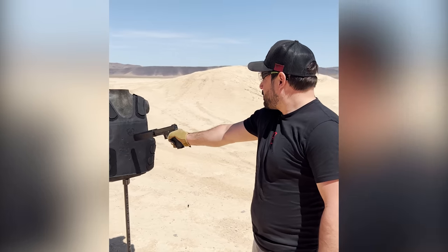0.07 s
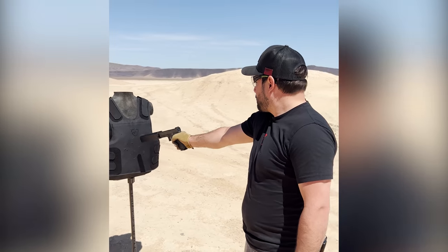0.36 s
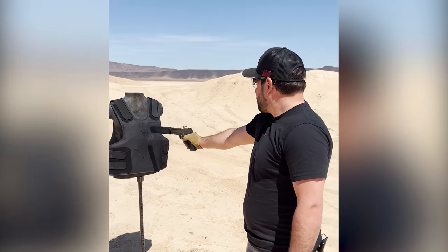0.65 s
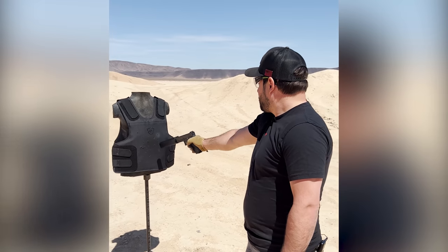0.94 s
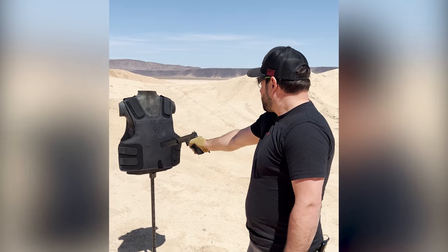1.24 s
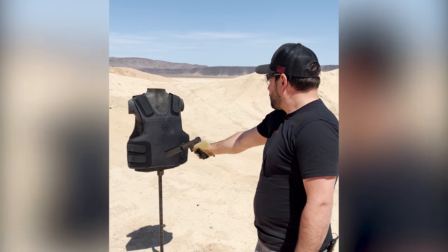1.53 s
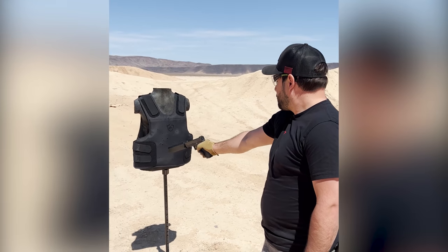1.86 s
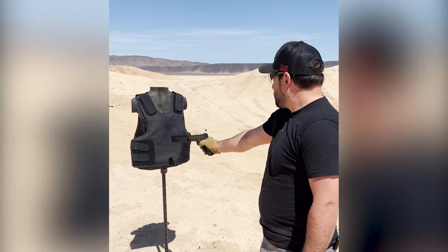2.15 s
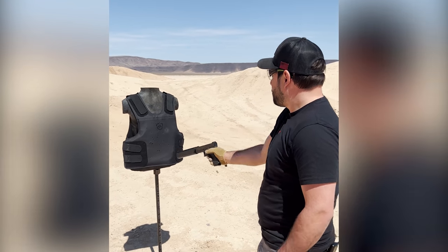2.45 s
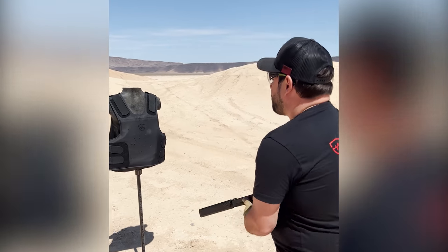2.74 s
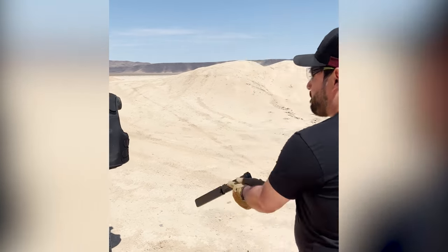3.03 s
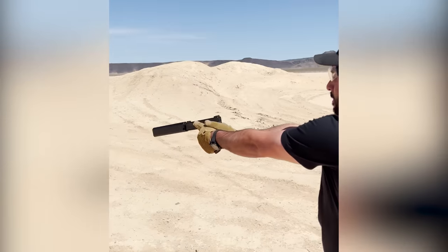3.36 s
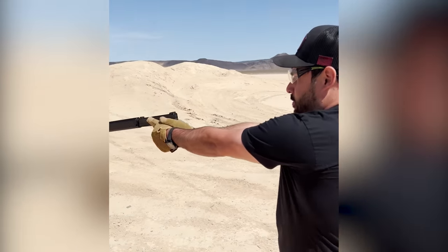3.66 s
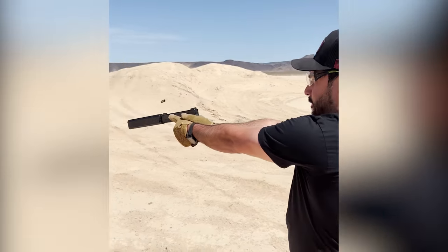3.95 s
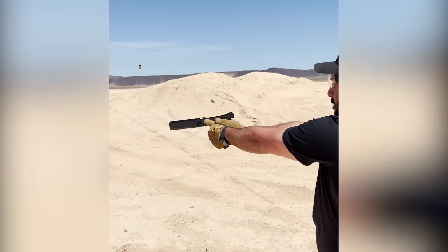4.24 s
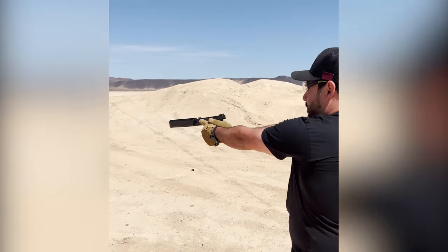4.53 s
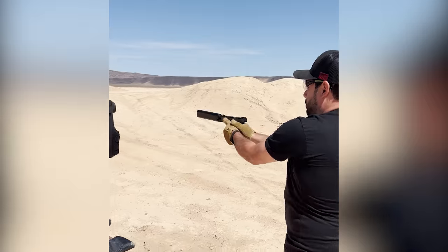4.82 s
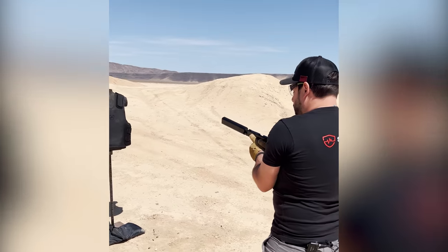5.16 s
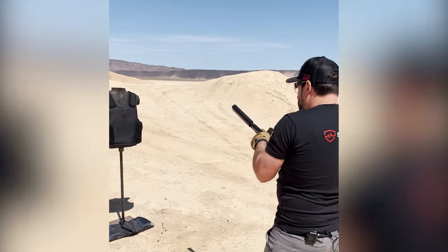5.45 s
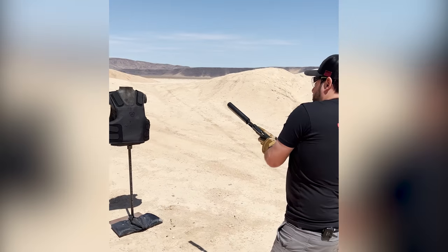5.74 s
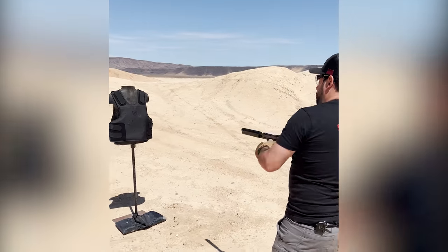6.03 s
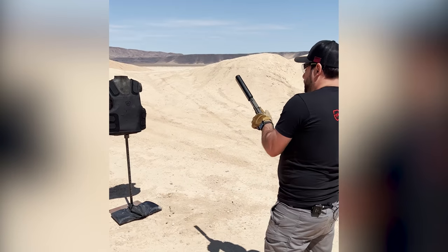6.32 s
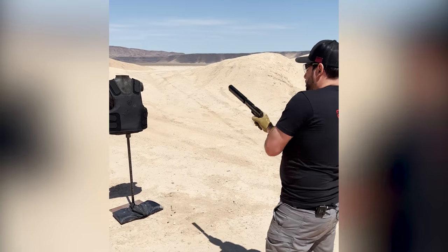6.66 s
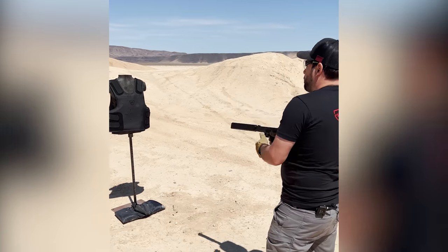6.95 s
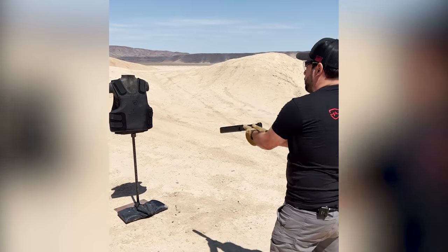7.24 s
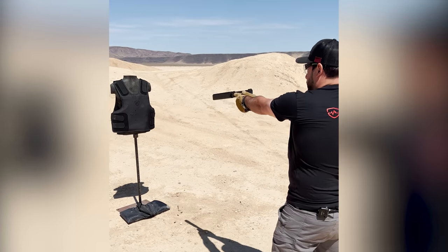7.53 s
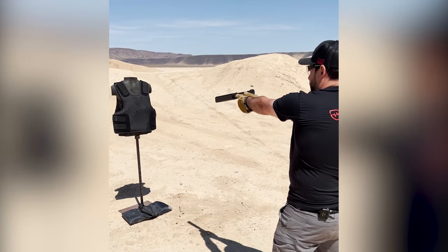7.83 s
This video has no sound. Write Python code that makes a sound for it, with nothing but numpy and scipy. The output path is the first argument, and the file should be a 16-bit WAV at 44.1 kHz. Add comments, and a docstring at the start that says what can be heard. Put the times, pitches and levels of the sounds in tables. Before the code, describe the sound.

A suppressed pistol fires five close shots, then two, is reloaded with metallic clacks and fires once more, as wind buffets the microphone.

```python
"""Five suppressed pistol shots in open desert, then two, a reload with the slide racked, and one more.
Each is a muzzle pop, a steel crack as the action opens and a dull thud. Most end with the slide closing
and the trigger resetting; on the seventh the slide locks back with a faint click. Sand rasps underfoot,
brass cases ring, clothes swish. From about 2.8 s gusts buffet the microphone of a phone a couple of
metres away; each bang ducks their rumble."""
import sys
import numpy as np
from scipy import signal
from scipy.fft import rfft, irfft
from scipy.io import wavfile
from scipy.ndimage import uniform_filter1d

SR = 44100
rng = np.random.default_rng(int(sys.argv[2]) if len(sys.argv) > 2 else 0)


def unload_audio(sound):
    """Save the sound as a 16-bit wav file, at the path given as the first command line argument."""
    columns = np.transpose(np.atleast_2d(sound))
    # keep every value between -1 and 1, then stretch to whole-number steps
    steps = np.round(np.clip(columns, -1, 1) * 32767)
    wavfile.write(sys.argv[1], SR, steps.astype(np.int16))


N = 352359
T = np.arange(N) / SR
HIT_T = T[:8192]


def amp(db):
    return 10 ** (np.asarray(db) / 20)


def add(out, start_s, x):
    i = max(int(start_s * SR), 0)
    out[i:i + len(x)] += x[:max(len(out) - i, 0)]


def band(x, lo_hz, hi_hz):
    return signal.sosfilt(signal.butter(2, [lo_hz, hi_hz], "band", fs=SR, output="sos"), x)


def colour(x, eq, tilt_db=0, size=4096):
    """Minimum-phase filter through (f/Hz, gain/dB) points, plus a tilt from 1.8 to 12 kHz."""
    hz, db = np.transpose(eq)
    log_f = np.log(np.maximum(np.fft.rfftfreq(size, 1 / SR), 1))
    gain_db = np.interp(log_f, np.log(hz), db) + tilt_db * np.interp(log_f, np.log([1800, 12000]), [0, 1])
    cepstrum = irfft(np.log(amp(gain_db)))
    cepstrum[1:size // 2] *= 2
    cepstrum[size // 2 + 1:] = 0
    return signal.fftconvolve(x, irfft(np.exp(rfft(cepstrum))))[:len(x)]


def whiten(force):
    """Flatten chance spectral peaks so a blow stays dry and unpitched."""
    power = uniform_filter1d(np.abs(rfft(force)) ** 2, size=64)
    hz = np.fft.rfftfreq(len(force), 1 / SR)
    return colour(force, np.column_stack([hz, -10 * np.log10(power)])[1:])


def unit_rms(x):
    return x / np.std(x)


def hit(x, db, window_s=0.003):
    """Scale x so its energy, packed into window_s, has an rms of db."""
    return x * amp(db) * np.sqrt(window_s * SR / np.sum(x ** 2))


def fade(t, t60_s):
    return np.exp(-np.log(1000) * t / t60_s)


def ring(modes, t, detune=0):
    """Decaying (f/Hz, level/dB, t60/s) modes; detune is the relative pitch spread between blows."""
    return sum(amp(db) * fade(t, t60_s) * np.sin(2 * np.pi * hz * (1 + detune * rng.standard_normal()) * t)
               for hz, db, t60_s in modes)


def contact(grind_s, t60_s, grain_db=4.5):
    """Force of parts grinding together, then chattering to rest in uneven grains."""
    grains = np.repeat(amp(grain_db * rng.standard_normal(len(HIT_T) // 32)), 32)
    return rng.standard_normal(len(HIT_T)) * grains * fade(np.maximum(HIT_T - grind_s, 0), t60_s)


def wander(rate_hz):
    """Smooth random control, spread near 1."""
    points = rng.standard_normal(N // 100)
    return np.sqrt(3 / 2) * np.interp(T * rate_hz, np.arange(len(points)), points)


def swells(rows, taper=1):
    """Summed power of (centre/s, length/s, level/dB) swells; taper is the share spent rising and falling."""
    power = np.zeros(N)
    for centre_s, length_s, db in rows:
        shape = signal.windows.tukey(int(length_s * SR), taper)
        add(power, centre_s - length_s / 2, (amp(db) * shape) ** 2)
    return power


# slide and frame modes: f/Hz, level/dB, t60/s
SLIDE_MODES = [(780, -1, .025), (2045, 3, .045), (2520, -2, .03), (3105, 2, .055), (3470, 0, .055),
               (4200, -2, .03), (5890, 0, .045), (6410, -1, .04), (7045, -3, .03), (9135, -3, .05),
               (9600, -2, .04), (10325, 0, .045), (11400, 1, .04), (13710, 0, .03), (14985, 4, .035)]


def steel(force, ring_db):
    """A force heard directly and through the modes of the slide."""
    modes = ring(SLIDE_MODES, HIT_T, detune=0.0033)
    return force + amp(ring_db) * signal.fftconvolve(force, modes)[:len(force)]


# striker and trigger spectrum: f/Hz, gain/dB
TRIGGER_EQ = [(200, -25), (700, -15.5), (1500, -11), (3000, -6.5), (3900, -17), (6000, 2.5), (7200, -6),
              (8800, -19), (11000, -10), (13000, 0.5), (16000, 2)]


def striker():
    """The striker falls with a short click."""
    return colour(contact(0.001, 0.006), TRIGGER_EQ, tilt_db=-8.5)


def muzzle_pop():
    """Gas leaves the suppressor: a damped pulse and a spit of hiss."""
    pulse = -ring([(1590, -1, 0.0038), (3100, -4, 0.00017)], HIT_T, detune=0.11)
    return pulse + amp(-12) * contact(0.00037, 0.016)


# spectrum of the action opening: f/Hz, gain/dB
CRACK_EQ = [(30, -27.5), (100, -4), (400, -2.5), (800, 4), (1600, -10.5), (2600, 3), (4200, -4.5),
            (6200, -0.5), (8500, -5.5), (11000, -5.5), (15000, 5.5), (17000, -1)]


def action_crack():
    """The action opens with a dry steel crack."""
    return colour(steel(whiten(contact(0.0029, 0.004)), ring_db=-56.5), CRACK_EQ)


def gas_boom():
    """The slow outflow of gas gives one low swing of pressure."""
    return band(ring([(105, 0.19, 0.034), (204, 0.81, 0.018)], HIT_T, detune=0.05), 58, 700)


# rear stop spectrum: f/Hz, gain/dB
THUD_EQ = [(25, -31.5), (70, -10.5), (200, -7), (380, -4.5), (630, 1.5), (870, -3.5), (1100, -2.5),
           (1450, -2), (2100, -8.5), (3000, -19), (8000, -27.5), (16000, -43)]


def slide_thud():
    """The slide hits its rear stop."""
    return colour(whiten(contact(0.004, 0.0083)), THUD_EQ)


# steel-on-steel spectrum: f/Hz, gain/dB
STEEL_EQ = [(80, -22), (450, -3.5), (780, 4.5), (1600, 0.5), (2200, 1), (3200, 1.5), (4200, 2.5),
            (5100, -1), (6500, 2), (8300, -4.5), (11000, 2.5), (15300, 1.5), (17000, -8.5)]


def rattle():
    """The spent case and loose parts rattle as the slide stops."""
    return colour(steel(contact(0.0013, 0.032), ring_db=-55.5), STEEL_EQ, tilt_db=-0.5)


# sand bank spectrum: f/Hz, gain/dB
BANK_EQ = [(60, 1.5), (250, 0.5), (500, 2), (850, 0.5), (1300, -5), (2200, -6.5), (4000, -16),
           (9000, -14.5), (16000, -20)]


def sand_bank():
    """Sand banks return the blast as a dry, patchy wash; 35 ms into it the bullet slaps dully into one."""
    t = T[:SR // 2]
    patchy = (rng.standard_normal(N) * amp(3 * wander(160)))[:len(t)]
    out = hit(colour(patchy * fade(t, 0.51), BANK_EQ), -34.5)
    bullet_slap = colour(contact(0.02, 0.055), BANK_EQ, tilt_db=-15)
    add(out, 0.035, hit(bullet_slap, -36.5))
    return out


def slide_latch():
    """The slide runs home or locks back: a sharp contact with a softer grind."""
    force = contact(0.00067, 0.022) + amp(-15) * contact(0.012, 0.041)
    return colour(steel(force, ring_db=-43), STEEL_EQ)


# shots: t/s, pop/dB, crack lag/ms, crack/dB, thud lag/ms, thud/dB, boom/dB, latch lag/ms, latch/dB
SHOTS = [(0.1821, -23, 2.16, -8.5, 7.15, -15.5, -24, 48.6, -27),
         (0.676, -17, 2.55, -7, 5.3, -22.5, -13.5, 48, -28),
         (1.1641, -20, 3.2, -8.5, 5.94, -9.5, -20, 47, -27.5),
         (1.676, -18.5, 2.32, -11.5, 5.07, -10.5, -25.5, 50, -26.5),
         (2.1499, -16.5, 2.75, -5, 6.2, -12.5, -14.5, 48, -27),
         (3.89, -15.5, 1.9, -16, 9.4, -10.5, -17, 48.5, -28.5),
         (4.1659, -12, 0.55, -14.5, 9.7, -12.5, -36, 40, -41),
         (7.7692, -11.5, 0.57, -12.5, 8.5, -11.5, -22, 51, -23)]


def gunfire():
    """The parts of each shot, timed from the muzzle pop."""
    out = np.zeros(N)
    for t_s, pop_db, crack_ms, crack_db, thud_ms, thud_db, boom_db, latch_ms, latch_db in SHOTS:
        parts = [(-2.6, hit(striker(), -36.5)),
                 (0, hit(muzzle_pop(), pop_db)),
                 (crack_ms, hit(action_crack(), crack_db)),
                 (crack_ms, hit(gas_boom(), boom_db)),
                 (thud_ms - 1.5, hit(slide_thud(), thud_db)),
                 (thud_ms, hit(rattle(), -16.5)),
                 (15, sand_bank()),
                 (latch_ms, hit(slide_latch(), latch_db))]
        for lag_ms, part in parts:
            add(out, t_s + lag_ms / 1000, part)
    return out


# ground scatter spectrum: f/Hz, gain/dB
GROUND_EQ = [(60, -15.5), (250, -8.5), (700, -3), (2000, -4.5), (5000, -4), (9000, -6.5), (16000, -1)]


def ground_scatter(x, db, t60_s=0.15, rise_s=0.0069):
    """No walls: a quick scatter off rough ground."""
    t = T[:SR // 2]
    envelope = fade(t, t60_s) * (1 - np.exp(-t / rise_s))
    response = colour(rng.standard_normal(len(t)) * envelope, GROUND_EQ)
    return amp(db) * signal.fftconvolve(x, response / np.linalg.norm(response))[:N]


# recoil spring modes: f/Hz, level/dB, t60/s
RECOIL_MODES = [(448, 1.5, 2.1), (860, -4.5, 1.4), (1370, -11.5, 0.69), (1830, -25, .7), (3110, -9, .4)]


def recoil_spring(shot_db=-63, release_s=6.73, release_db=-56):
    """The spring hums after each shot, harder when the slide is let go by hand."""
    out = np.zeros(N)
    strokes = [(t_s, shot_db) for t_s, *_ in SHOTS] + [(release_s, release_db)]
    for t_s, db in strokes:
        add(out, t_s, amp(db) * ring(RECOIL_MODES, T[:SR], detune=0.00049))
    return out


def tick(db, tilt_db, hz):
    """A small part touches another and rings briefly."""
    tone = ring([(hz, 0, 0.0035)], HIT_T, detune=0.02)
    touch = hit(contact(0.00064, 0.0061), 0) + hit(tone, -7.5)
    return hit(colour(touch, STEEL_EQ, tilt_db), db)


# light contacts: t/s, level/dB, tilt/dB, f/Hz
PART_TICKS = [(0.3075, -43.5, -12, 5500), (1.0865, -54, 5, 6000), (1.131, -53, -20.5, 2400),
              (1.296, -44, -51, 1220), (2.3397, -52, -25.5, 1500), (2.4589, -48, -21, 4200),
              (2.7733, -45, -44, 4000), (2.8702, -45.5, -15, 3460), (2.8936, -41, -25, 3480),
              (2.914, -42, 29, 11100), (4.137, -28, 8.5, 11500), (4.144, -26.5, 11.5, 3000),
              (4.895, -31, -9, 1110), (4.9859, -36, -20, 2520), (5.027, -45, -14, 5000),
              (5.05, -36, 0, 5570), (5.071, -39, -40, 1690), (5.167, -51, 12, 11000),
              (5.2276, -49.5, -28, 3520), (5.2908, -51, -18, 1800), (5.831, -37, 14, 12000),
              (5.9605, -49, 10, 10000), (6.441, -43.5, -17, 3770), (6.5342, -30.5, -9.5, 4100),
              (7.3424, -38.5, -13, 13000), (7.5612, -43.5, -25, 2440)]


def part_ticks():
    """Gun parts and cases touch lightly."""
    out = np.zeros(N)
    for t_s, db, tilt_db, hz in PART_TICKS:
        add(out, t_s, tick(db, tilt_db, hz))
    return out


# trigger resets: t/s, level/dB, tilt/dB
TRIGGER_RESETS = [(0.366, -23.5, 1), (0.8306, -25.5, 0), (1.3619, -21, 1.5), (1.8653, -22, 2.5),
                  (2.3431, -21, -1), (4.0475, -30, -13.5), (7.924, -26.5, -7)]


def trigger(take_up_s=0.049, rebound_s=0.0062, rebound_db=-12.5):
    """The trigger takes up slack before a shot; its reset snaps and rebounds."""
    out = np.zeros(N)
    for t_s, *_ in SHOTS:
        add(out, t_s - take_up_s, tick(db=-55, tilt_db=-1, hz=6230))
    for t_s, db, tilt_db in TRIGGER_RESETS:
        for lag_s, drop_db in [(0, 0), (rebound_s, rebound_db)]:
            snap = steel(whiten(contact(0.00041, 0.0078)), ring_db=-52)
            add(out, t_s + lag_s, hit(colour(snap, TRIGGER_EQ, tilt_db), db + drop_db))
    return out


# sand spectrum: f/Hz, gain/dB
SAND_EQ = [(150, 1.5), (400, 8), (780, 12.5), (1050, 3), (1600, 1.5), (2150, 0.5), (3000, -11),
           (4800, -9.5), (7000, -20.5), (16000, -30.5)]
# shoe scuffs: centre/s, length/s, level/dB
SHOE_SCUFFS = [(.61, 0.085, -51), (.9, 0.63, -66), (1.32, .14, -62), (2.57, 0.17, -56.5), (3.36, .68, -54),
               (3.525, 0.064, -45), (5.53, 0.045, -50.5), (5.85, 0.65, -58), (6.42, 0.39, -64.5),
               (7.14, .11, -51), (7.3, .16, -52), (7.55, 0.8, -65)]


def sand(floor_db=-67.5):
    """Sand rasps under shoes, never quite still."""
    rasp = colour(rng.standard_normal(N) * amp(1.5 * wander(490)), SAND_EQ)
    return unit_rms(rasp) * np.sqrt(amp(floor_db) ** 2 + swells(SHOE_SCUFFS, taper=0.45))


# free-ringing cases: t/s, f/Hz, level/dB, t60/s, throb depth/0-1
CASE_PINGS = [(.818, 11220, -51.5, 0.2, 0), (2.461, 10940, -57, 0.22, 0.06), (2.949, 11020, -38, 0.19, 0),
              (4.143, 11600, -46, 0.8, 0.8), (4.894, 11590, -27, 0.29, 0), (5.052, 10660, -35, 0.22, .3),
              (5.324, 10700, -54, 0.35, 0)]


def brass_cases(tumble_hz=17, knock_ratio=0.42, knock_db=2.5, knock_t60_s=0.005):
    """Struck cases knock on a low mode and ring on a high one; some throb as they tumble."""
    out, t = np.zeros(N), T[:SR]
    for t_s, hz, db, t60_s, depth in CASE_PINGS:
        throb = 1 - depth * np.sin(np.pi * tumble_hz * t) ** 2
        modes = [(hz, db, t60_s), (knock_ratio * hz, db + knock_db, knock_t60_s)]
        add(out, t_s, throb * ring(modes, t))
    return out


# wind rumble spectrum: f/Hz, gain/dB
WIND_EQ = [(15, -30.5), (25, -21.5), (40, -10.5), (60, -2), (72, -1), (85, 2), (100, 0), (150, -4),
           (230, -12.5), (330, -22.5), (600, -38), (1200, -48.5), (2500, -72.5), (6000, -85)]
# breeze, springing up suddenly: t/s, level/dB
BREEZE_LEVELS = [(0, -62), (2.75, -58), (2.78, -37), (4.3, -33), (6.1, -33.5), (6.27, -49), (6.9, -50.5),
                 (7.2, -38), (7.98, -43.5)]
# gusts: centre/s, length/s, level/dB, flutter re rumble/dB
WIND_GUSTS = [(3.192, 0.5, -28, -20.5), (3.419, .26, -18.5, -26.5), (3.76, 0.52, -21, -26),
              (4.127, 0.24, -30.5, -35.5), (4.368, 0.3, -29, -31), (4.6, 0.53, -23, -38.5),
              (4.743, 0.43, -20, -26.5), (5.24, 0.41, -33, -20), (5.701, 0.16, -29.5, -34),
              (5.895, 0.27, -25.5, -20), (6.085, 0.45, -37.5, -13.5), (6.503, 0.58, -33, -47),
              (6.75, 0.27, -37.5, -34), (7.02, 0.15, -40.5, -36), (7.257, 0.39, -36, -35),
              (7.668, 0.31, -27, -21), (7.964, 0.22, -32, -24.5)]


def wind(breeze_flutter_db=-27):
    """Eddies shake the microphone port, harder in gusts; strong eddies carry a flutter of hiss."""
    eddies = unit_rms(colour(rng.standard_normal(N), WIND_EQ))
    eddies /= np.sqrt(uniform_filter1d(eddies ** 2, size=SR // 10))  # steady rms over 0.1 s
    flutter = unit_rms(band(rng.standard_normal(N), 360, 570) * np.abs(signal.hilbert(eddies)))
    breeze = amp(np.interp(T, *np.transpose(BREEZE_LEVELS)))
    gust_rumble = swells([row[:3] for row in WIND_GUSTS])
    gust_flutter = swells([(t_s, length_s, db + rel_db) for t_s, length_s, db, rel_db in WIND_GUSTS])
    rumble_power = breeze ** 2 + gust_rumble
    flutter_power = (breeze * amp(breeze_flutter_db)) ** 2 + gust_flutter
    return eddies * np.sqrt(rumble_power) + flutter * np.sqrt(flutter_power)


# cloth spectrum: f/Hz, gain/dB
CLOTH_EQ = [(500, -23.5), (2000, 3), (4500, 0.5), (6500, -1), (8500, -2), (11500, 2.5), (15000, 6.5),
            (17000, -4)]
# swishes: centre/s, length/s, level/dB
CLOTH_SWISHES = [(2.8, 0.69, -60), (3.19, 0.54, -54), (3.5, .2, -60.5), (5.0, 0.88, -62), (5.4, 0.26, -57),
                 (5.62, 0.51, -57.5), (6.1, 1, -66), (6.47, 0.15, -57), (6.8, 1, -64), (7.13, 0.24, -58.5),
                 (7.29, 0.42, -56.5), (7.47, 0.25, -60)]


def clothes(floor_db=-71.5):
    """The shooter's clothes hiss with each movement, never quite still."""
    flicker_db = 1.1 * wander(270) + 1.2 * wander(41)
    hiss = colour(rng.standard_normal(N) * amp(flicker_db), CLOTH_EQ)
    return unit_rms(hiss) * np.sqrt(amp(floor_db) ** 2 + swells(CLOTH_SWISHES))


# metal clinks: t/s, f/Hz, level/dB
METAL_CLINKS = [(4.0475, 12000, -13.5), (4.136, 11200, -19.5), (4.1419, 11350, -10), (4.143, 2860, -23),
                (4.143, 7200, -21), (4.988, 13660, -19.5)]


def clinks(t60_s=0.011):
    """Bright metal rings, damped at once."""
    out = np.zeros(N)
    for t_s, hz, db in METAL_CLINKS:
        add(out, t_s, ring([(hz, db, t60_s)], HIT_T))
    return out


# grip and open action modes: f/Hz, level/dB, t60/s
ACTION_MODES = [(1100, -37, 0.0024), (2076, -35.5, 0.051), (3510, -35.5, .03), (3740, -33, 0.024),
                (4540, -34, .03), (7000, -41.5, .015), (15200, -31.5, .006)]


def clack(force, tilt_db, ring_db):
    """A force on slide or magazine, heard directly and through the modes of the action."""
    body = signal.fftconvolve(force, ring(ACTION_MODES, HIT_T, detune=0.003))[:len(force)]
    return colour(steel(force, ring_db=-54.5) + amp(ring_db) * body, STEEL_EQ, tilt_db)


# reload blows: t/s, level/dB, tilt/dB, contact/s, action ring/dB
RELOAD_CLACKS = [(5.7414, -10.5, 12.5, 0.0025, 8.5), (5.7576, -24.5, 4, 0.0032, -2),
                 (5.7704, -14, -11, .0016, -6), (5.9028, -18.5, 2, 0.0039, -3.5),
                 (5.91, -13, -2.5, 0.0034, -2.5), (5.9245, -26.5, -15, 0.0018, 0.5),
                 (6.5714, -15.5, -1, 0.0034, -1), (6.5942, -11, 5, 0.004, 3.5),
                 (6.6111, -13, 3.5, 0.0036, -1), (6.6252, -14.5, -5, 0.0011, -8),
                 (6.703, -27, -2, .004, -6.5), (6.71, -16.5, 3, 0.012, -6),
                 (6.7228, -10, 6.5, 0.0014, -2.5), (6.7314, -12.5, 5.5, 0.0025, -7),
                 (7.083, -24, -5, 0.0014, -11), (7.087, -35.5, -14, 0.0013, -14)]


def reload_clacks(lead_s=0.007, rebound_s=0.0062):
    """Magazine and slide worked by hand: a scrape, a blow, a duller rebound."""
    out = np.zeros(N)
    for t_s, db, tilt_db, contact_s, ring_db in RELOAD_CLACKS:
        scrape = colour(contact(0.005, 0.0083), STEEL_EQ, tilt_db)
        blow = clack(whiten(contact(contact_s, 0.012)), tilt_db, ring_db)
        rebound = clack(contact(0.0015, 0.027), tilt_db - 3.5, ring_db)
        add(out, t_s - lead_s, hit(scrape, db - 14))
        add(out, t_s, hit(blow, db))
        add(out, t_s + rebound_s, hit(rebound, db - 14))
    return out


# magazine spring modes: f/Hz, level/dB, t60/s
MAGAZINE_MODES = [(576, -69.5, 0.7), (890, -56, 1), (1351, -67.5, .9), (2180, -60, 0.48), (3180, -60, 0.5),
                  (3245, -58, 0.55)]


def magazine_spring(seated_s=5.91):
    """The spring rings as the magazine seats."""
    out = np.zeros(N)
    add(out, seated_s, ring(MAGAZINE_MODES, T[:SR]))
    return out


def scene():
    """Gun and handling with their ground scatter, ringing metal, sand, wind and clothes, in mono."""
    shots = gunfire()
    handling = part_ticks() + trigger() + reload_clacks()
    scatter = ground_scatter(shots, db=-26) + ground_scatter(handling, db=-24.5)
    ringing = recoil_spring() + brass_cases() + clinks() + magazine_spring()
    return (shots + handling + scatter + ringing + sand() + wind() + clothes())[None]


def duck_bass(x, threshold_db=-36.5, slope=0.98, max_cut_db=20, below_hz=360,
              lag_s=0.015, attack_s=0.016, release_db_per_s=103):
    """Gain control: a bang in the mids pushes the bass down; it recovers at a steady rate."""
    mid_power = uniform_filter1d(band(x, 500, 1970) ** 2, size=SR // 50)
    over_db = 10 * np.log10(np.maximum(mid_power, 1e-12)) - threshold_db
    recovery_db = release_db_per_s * T
    held_db = np.maximum.accumulate(over_db + recovery_db) - recovery_db
    cut_db = uniform_filter1d(np.clip(slope * held_db, 0, max_cut_db), int(attack_s * SR))
    cut_db = np.interp(T - lag_s - attack_s, T, cut_db)
    bass = signal.sosfiltfilt(signal.butter(2, below_hz, fs=SR, output="sos"), x)
    return x - bass * (1 - amp(-cut_db))


def record(dry):
    """The phone ducks the bass after bangs, sheds deep rumble, rounds peaks and cuts the top."""
    low_hz, top_hz, ceiling = 42, 16150, 0.88
    ducked = duck_bass(dry[0])[None]
    thinned = signal.sosfilt(signal.butter(2, low_hz, "high", fs=SR, output="sos"), ducked)
    rounded = thinned / (1 + (thinned / ceiling) ** 4) ** 0.25
    lowpass = signal.firwin(255, top_hz, fs=SR, window="blackman")
    return signal.fftconvolve(rounded, lowpass[None], "same")


dry = scene()
out = record(dry)
unload_audio(out)
```